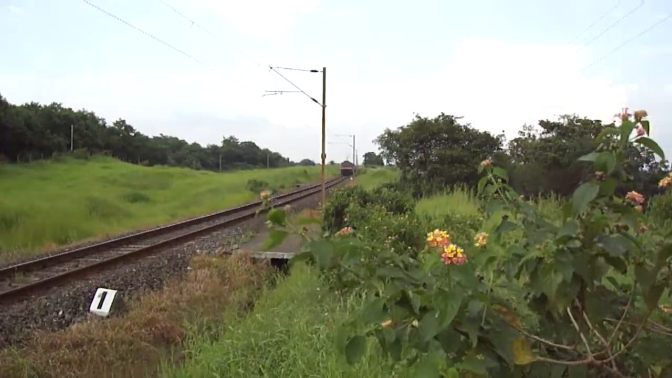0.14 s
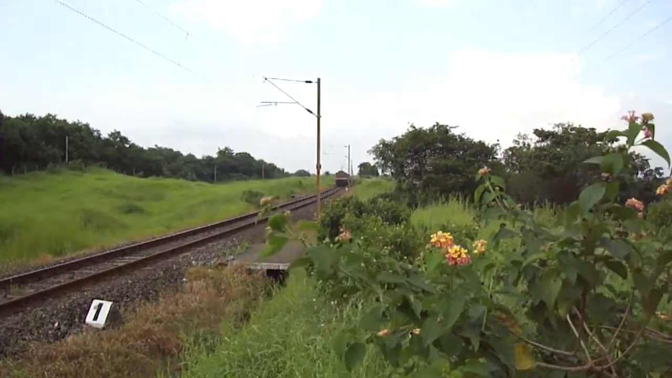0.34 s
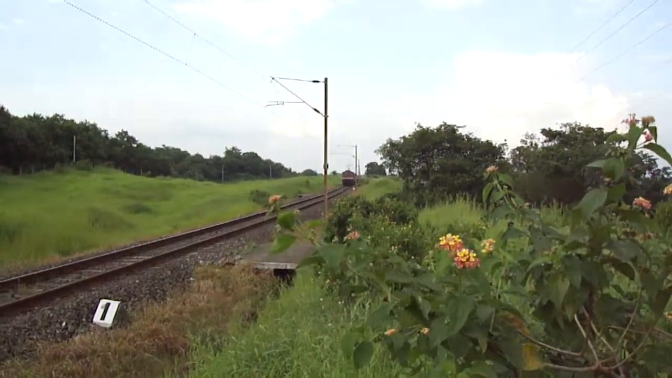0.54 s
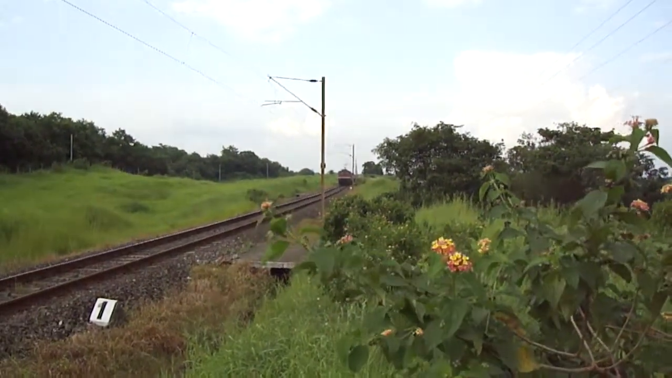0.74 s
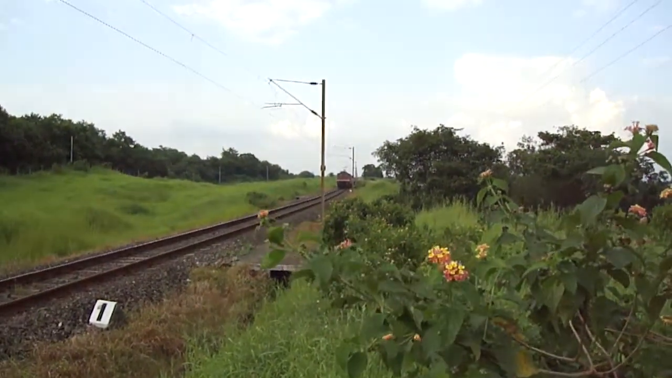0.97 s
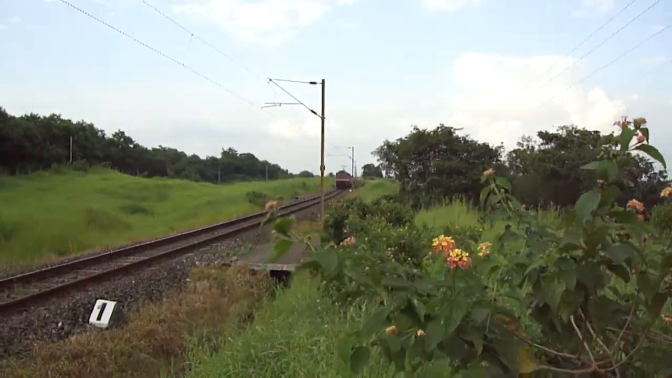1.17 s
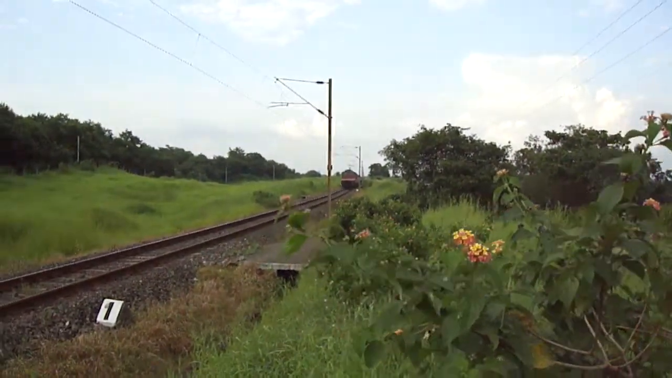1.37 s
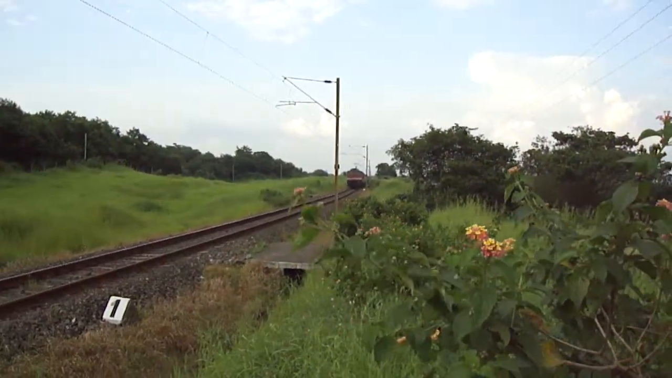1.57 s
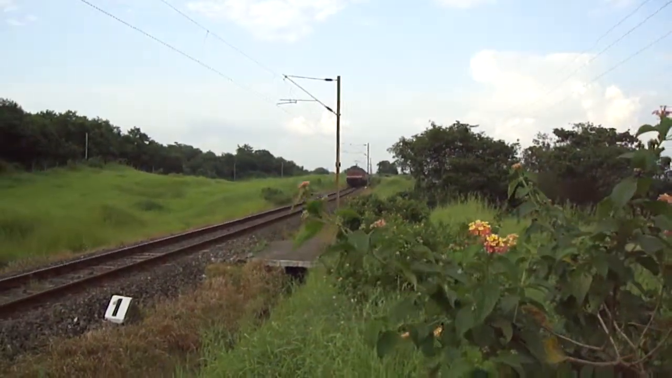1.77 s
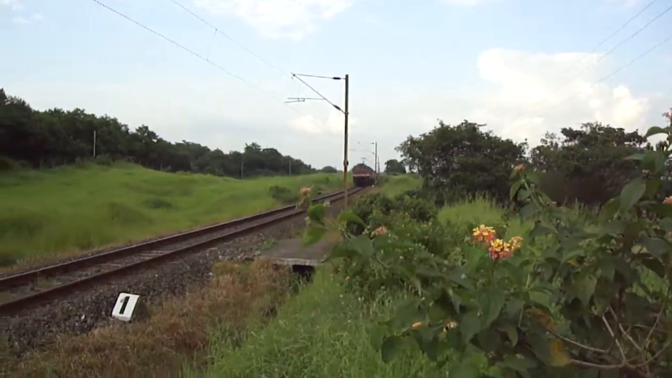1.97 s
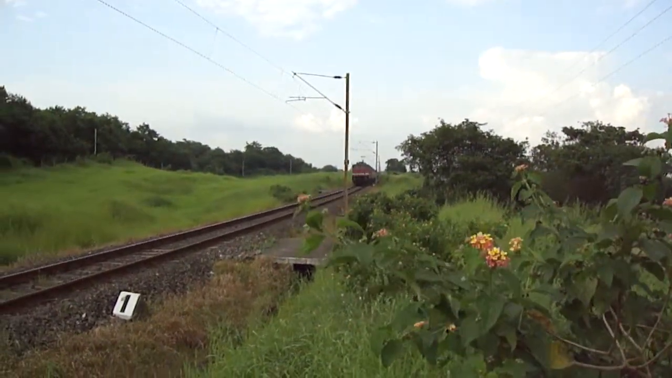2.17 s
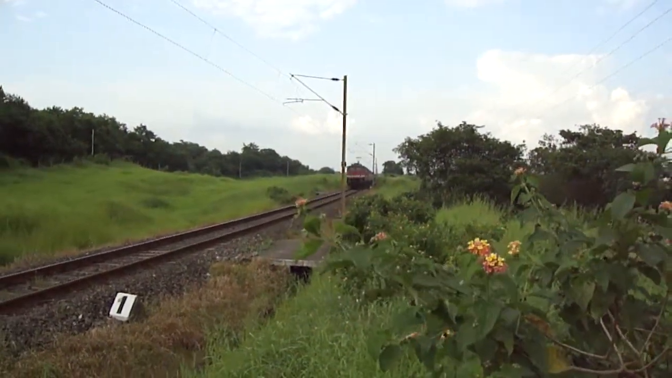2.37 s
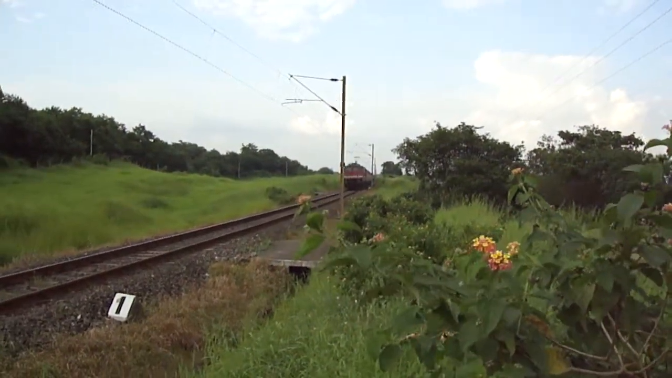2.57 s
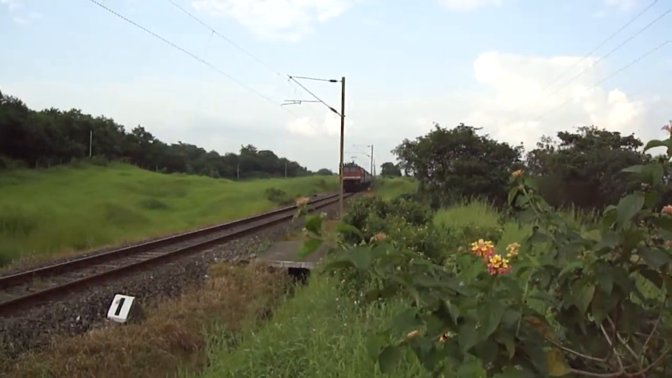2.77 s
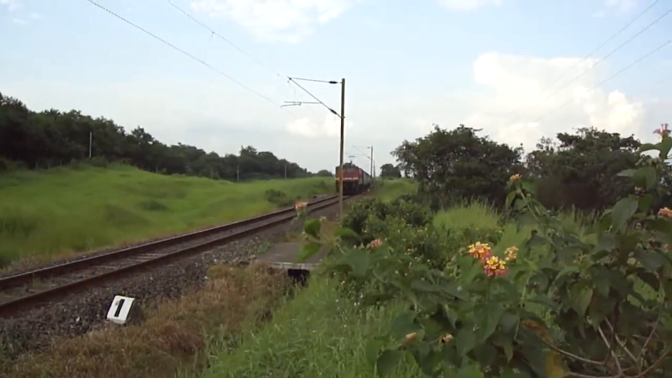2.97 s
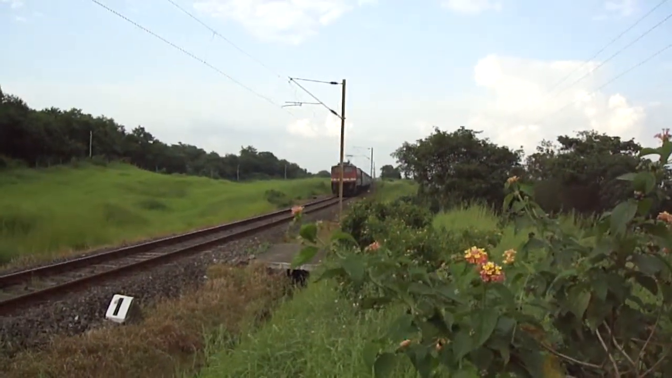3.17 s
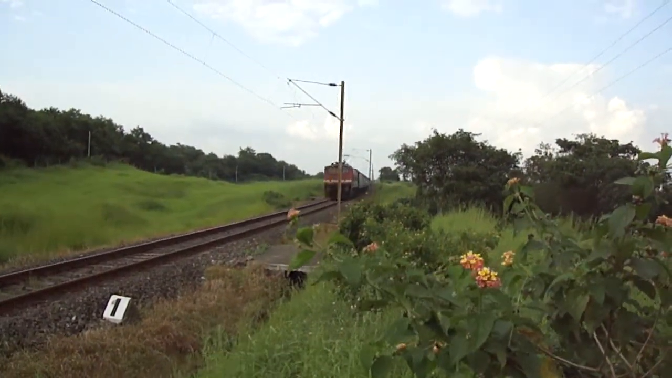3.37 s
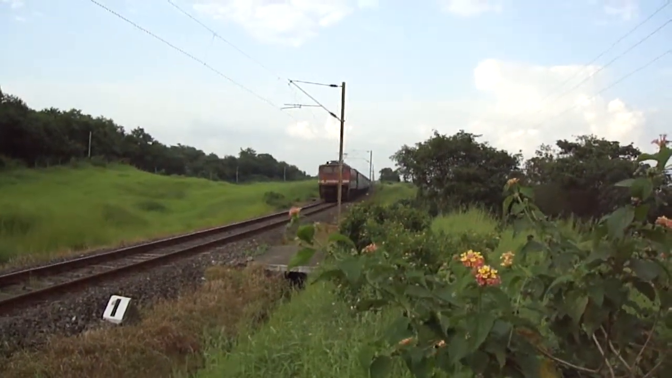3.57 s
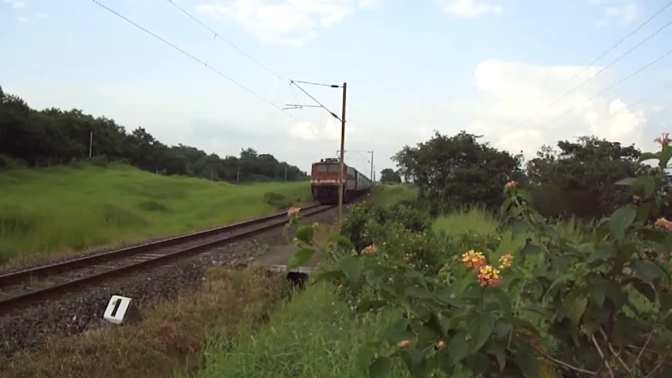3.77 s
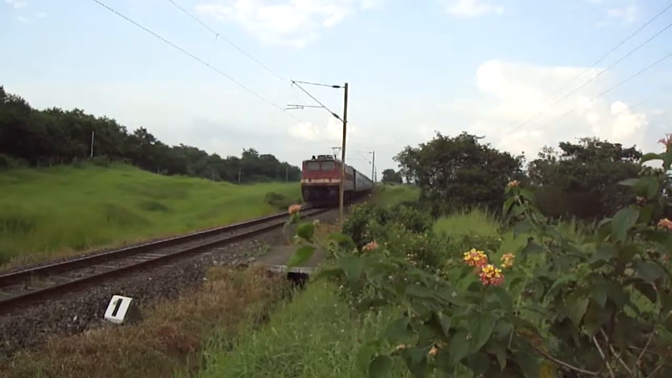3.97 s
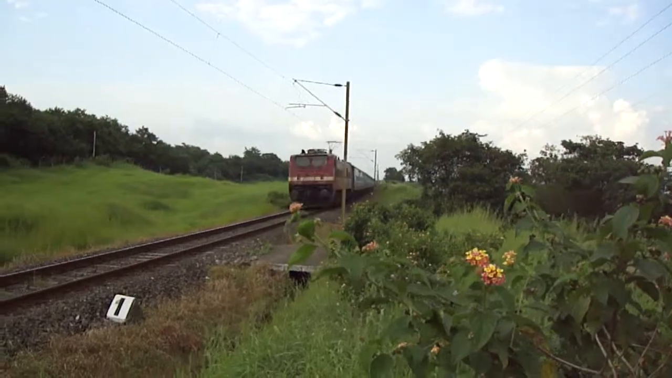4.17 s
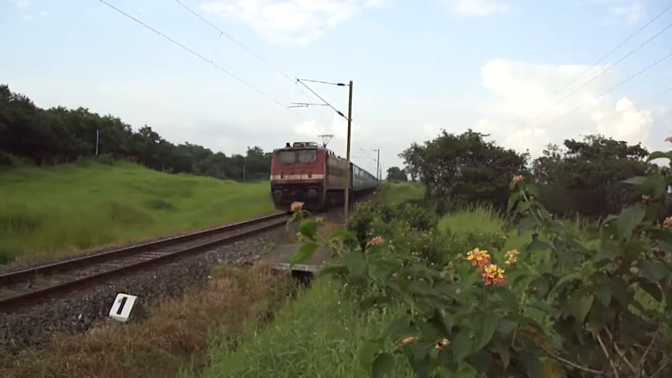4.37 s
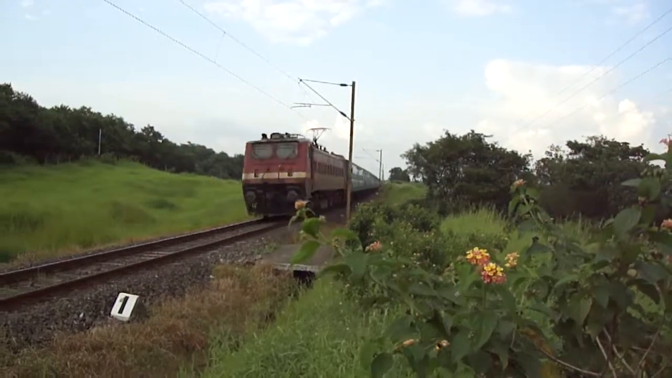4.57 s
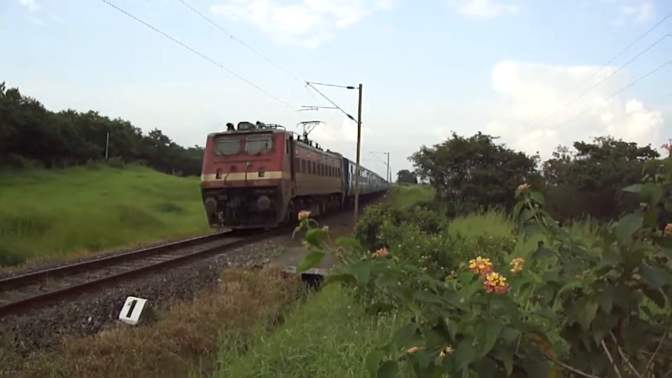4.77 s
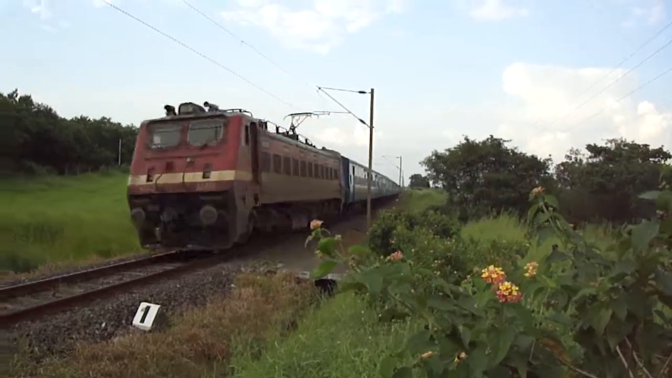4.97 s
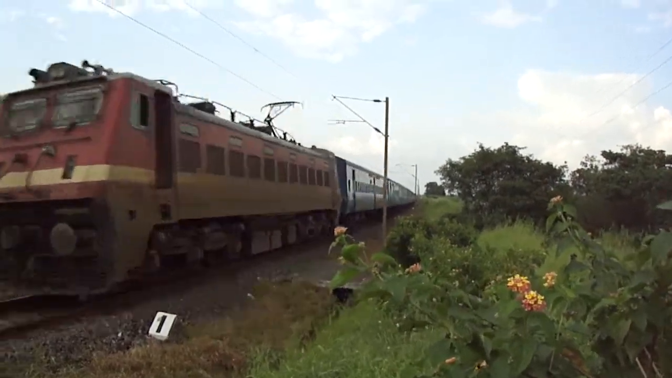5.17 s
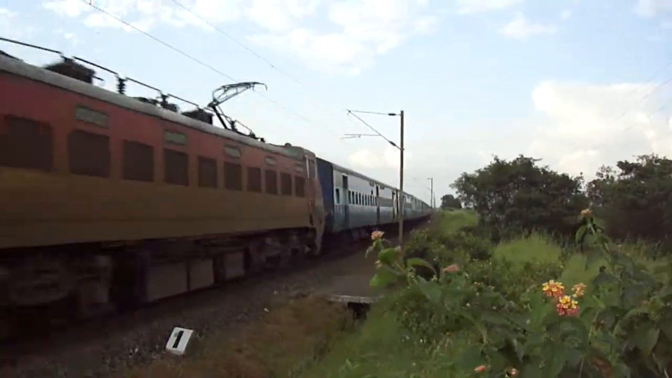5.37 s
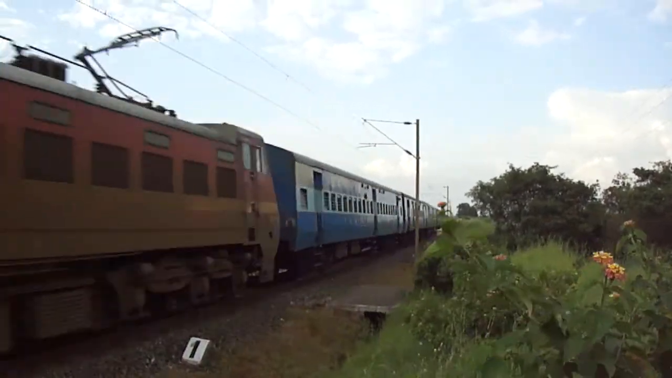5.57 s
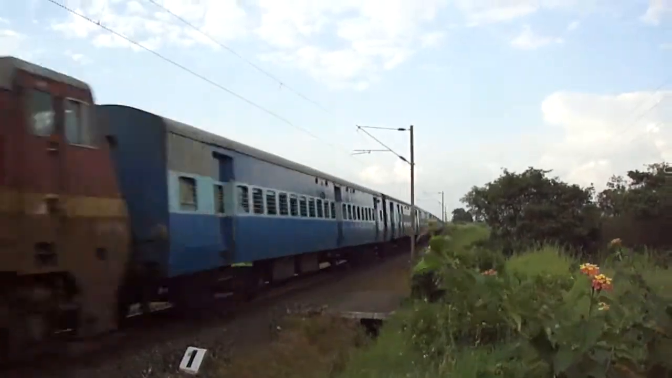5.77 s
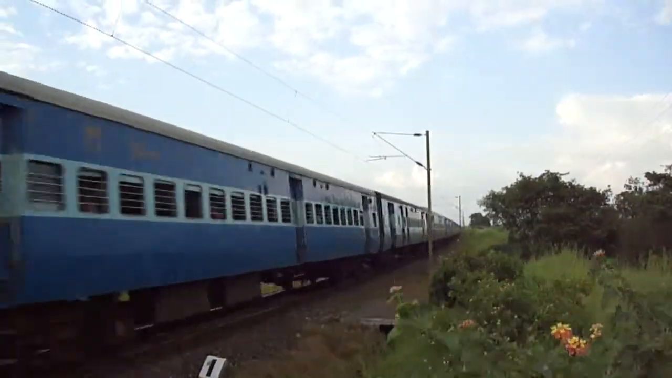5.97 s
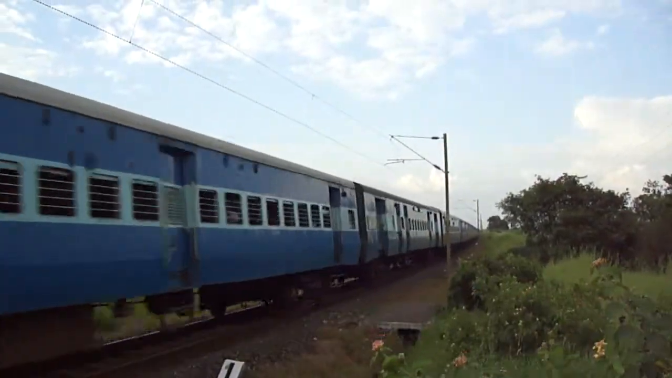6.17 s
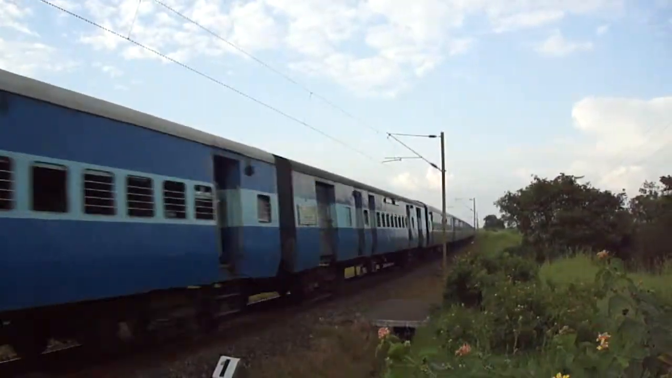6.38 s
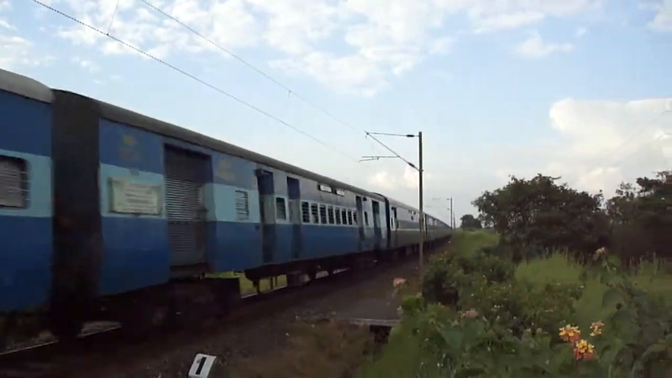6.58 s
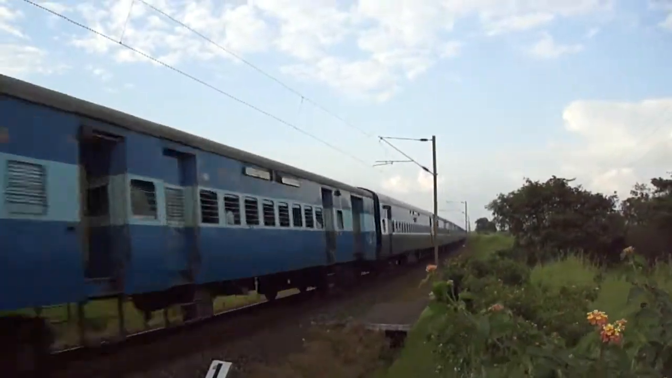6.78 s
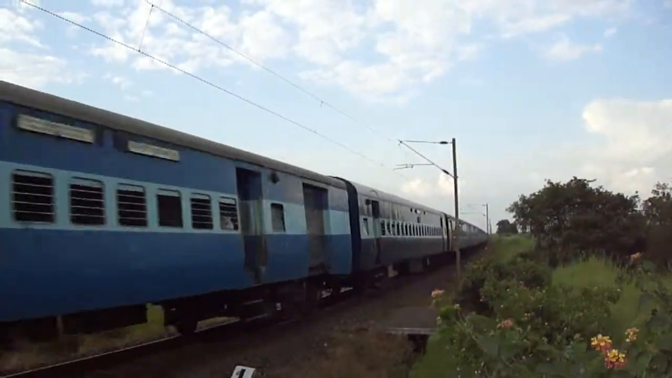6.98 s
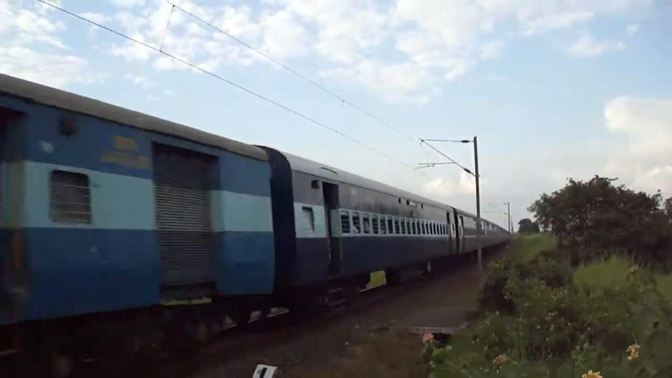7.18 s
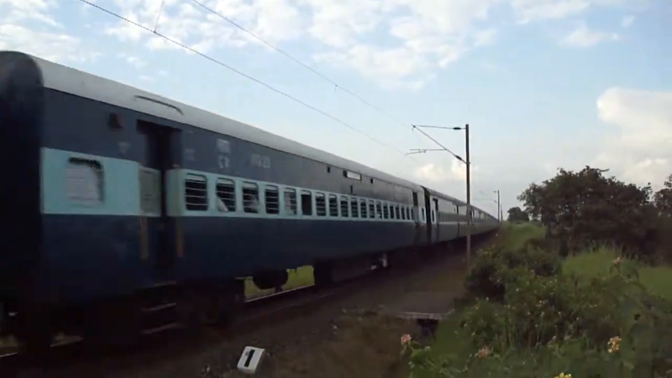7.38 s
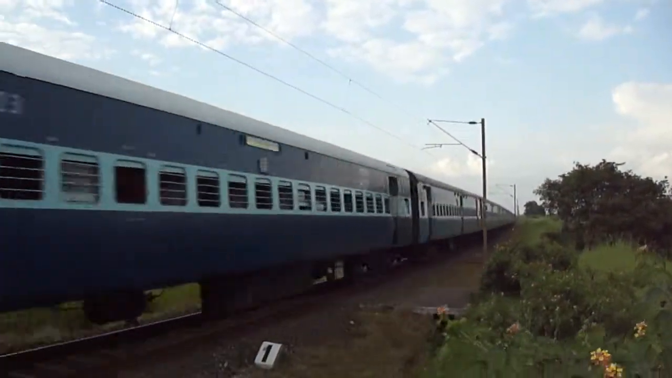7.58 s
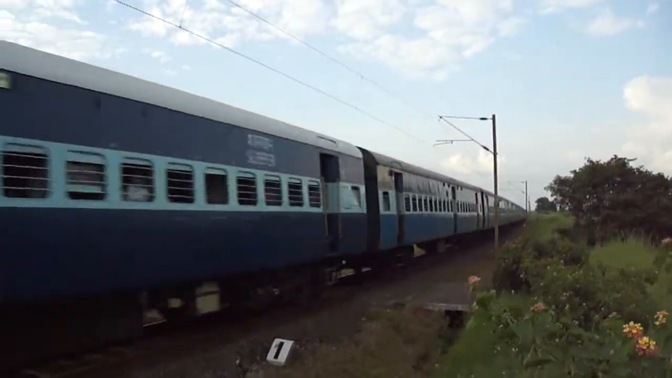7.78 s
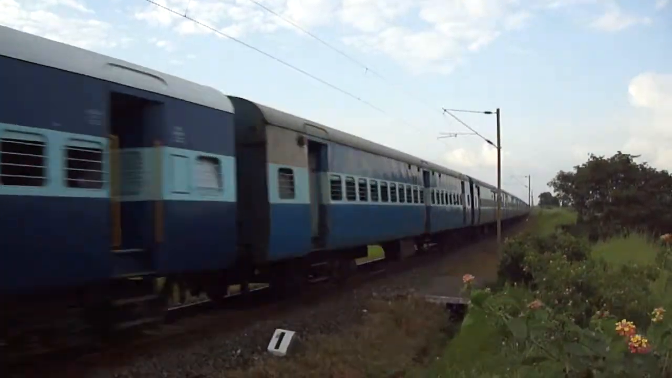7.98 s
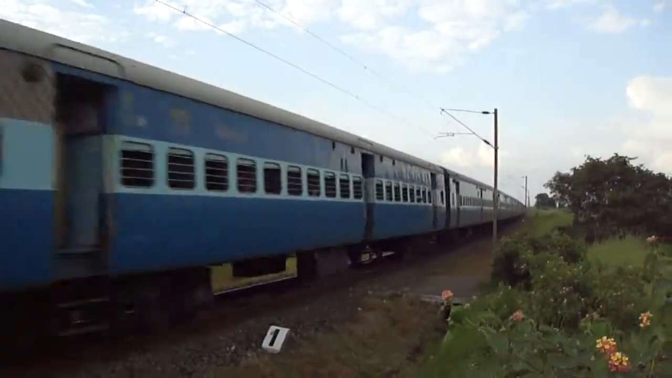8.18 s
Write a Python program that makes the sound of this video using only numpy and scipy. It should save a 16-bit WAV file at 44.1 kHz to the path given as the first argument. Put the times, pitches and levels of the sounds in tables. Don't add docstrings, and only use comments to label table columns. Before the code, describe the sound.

A small recorder sits close to open track. Quick falling bird notes and soft wind sit over a far rail hum around a steady mid pitch. The train swells, sounds a piercing horn twice in quick succession, with sagging tails and echoes, then passes in a broad wheel roar. Motor whine drops away, brief metallic squeaks flick by, and hard irregular knocks of coach wheels continue to the end.

```python
import sys
import numpy as np
from scipy import signal
from scipy.fft import rfft, irfft, next_fast_len
from scipy.io import wavfile

SR = 44100
rng = np.random.default_rng(int(sys.argv[2]) if len(sys.argv) > 2 else 0)


def elevation(decibels):
    levels = np.asarray(decibels, float)
    return 10 ** (levels / 20)


def file_out(sig):
    cols = np.atleast_2d(sig).T
    lim = np.clip(cols, -1, 1)
    pcm = np.round(lim * 32767).astype(np.int16)
    wavfile.write(sys.argv[1], SR, pcm)


N = 362943
T = np.arange(N) / SR
CUTOFF_HZ = 10930

ROLLING_HZ = [170, 600, 1000, 1400, 4000, 11200]
# pitch_hz, level_db (per Hz)
NEAR = [(18, -76), (30, -79), (181, -23), (274, -8), (318, -7), (378, -7.5), (665, -5.5), (829, -6),
        (1030, -6), (1260, -14.5), (1390, -11), (1960, -8.5), (2840, -12), (4870, -13), (10700, -27.5),
        (13900, -40), (22000, -120)]
# time_s, roar_db, weight_db (body over wheel hiss)
TRAIN = [(0, -46.5, 0), (.9, -44.5, 0.5), (1.35, -40, -2), (1.7, -38.5, -1), (2.2, -39, 1), (2.8, -37.5, 5),
         (3.4, -34, 2.5), (3.8, -31, 4), (3.93, -29.5, 5), (4.62, -20, -3), (5.16, -24.5, 3),
         (5.5, -24.5, 2), (6.05, -23.5, 5), (6.35, -27, 3.5), (6.6, -26, 0), (7.25, -26, -3.5),
         (7.5, -24.5, 0), (7.72, -27.5, 1.5), (7.9, -28, 1), (8.23, -24, -4.5)]
# opens_s, shuts_s, turned_down_db, recovery_s
VALVE = [
    (3.973, 4.37, 18.5, 0.23),
    (4.71, 4.965, 21.5, 0.08),
]
EMPTY_S = [4.46, 5.022]


def bump(x, width):
    return np.exp(-(x / width) ** 2)


def rms_one(x):
    return x / np.sqrt(np.mean(x ** 2) + 1e-20)


def in_time(rows):
    s, *columns = np.transpose(rows)
    return [np.interp(T, s, c) for c in columns]


def inside(rows, fade_s):
    return np.clip(np.minimum(T - rows[0][0], rows[-1][0] - T) / fade_s, 0, 1)


def drift(rate):
    r = np.exp(-80 * np.pi * rate / SR)
    slow = signal.lfilter([1], [1, -2 * r, r * r], rng.standard_normal(N // 40 + 2002))[2000:]
    return np.interp(np.arange(N) / 40, np.arange(len(slow)), rms_one(slow))


def noise(spectrum, low_hz, high_hz):
    size = next_fast_len(N)
    hz = np.arange(size // 2 + 1) * SR / size + 1
    colour_hz, colour_db = np.transpose(spectrum)
    colour = elevation(np.interp(np.log(hz), np.log(colour_hz), colour_db))
    edges = 1 / np.sqrt((1 + (low_hz / hz) ** 30) * (1 + (hz / high_hz) ** 30))
    return rms_one(irfft(rfft(rng.standard_normal(size)) * colour * edges, size)[:N])


def resonance(x, hz, width_hz):
    r = np.exp(-np.pi * width_hz / SR)
    top = (1 - r * r) / 2
    return signal.lfilter([top, 0, -top], [1, -2 * r * np.cos(2 * np.pi * hz / SR), r * r], x + 1e-18)


def nearness():
    # time_s, share (0-1)
    closing_in = [
        (0, 0),
        (4.0, 0.02),
        (5.4, 0.55),
        (6.3, 0.94),
        (8.3, 1),
    ]
    return np.clip(in_time(closing_in)[0], 0, 1)


def whine(rows, waver_db, waver_rad):
    hz, level_db = in_time(rows)
    phase = 2 * np.pi * np.cumsum(hz) / SR + waver_rad * drift(12.2)
    return np.sqrt(2) * elevation(level_db + waver_db * drift(50)) * np.sin(phase) * inside(rows, 0.0065)


def rolling(patchy_db):
    # pitch_hz, level_db (per Hz)
    far_colour = [(160, -26), (350, -28.5), (520, -28.5), (690, -6.5), (1000, -8), (1500, -22), (2800, -29),
                  (3400, -26), (4100, -34), (5300, -37), (7000, -40), (8200, -48.5), (10700, -49.5),
                  (12000, -51)]
    # far_db, near_db, far_share and near_share (of the weight)
    band_levels = [
        (-8, -6, 0.53, 0.67),
        (-0.5, -1, 1.13, -0.11),
        (-0.5, -1, 0.012, -0.17),
        (-8, -5.5, 0.24, -0.98),
    ]
    # time_s, swell_db, pitch_hz
    swells = [(5.85, 6.5, 930), (5.3, 5.5, 4700), (5.231, 6, 4700), (5.13, 4, 4500), (5.3, 3.5, 300),
              (5.4, 4, 300), (5.48, 3.5, 260), (5.98, -0.5, 5300), (7.23, -2, 800), (5.38, 3.5, 3600),
              (5.55, 4.5, 1900), (5.45, 3.5, 3400), (5.4, 3, 4600), (6.5, 6.5, 800), (6.58, 2, 900),
              (6.67, 7.5, 430), (6.792, 13.5, 970), (6.95, 2.5, 6100), (7.09, 4, 620), (7.17, 4, 330),
              (9.1, 1, 7000), (7.29, 2.5, 7000), (7.34, 6.5, 360), (7.385, 7, 760), (7.39, 3, 2400),
              (7.46, -7, 600), (7.55, 4, 900), (7.56, 4, 2800), (10, 6, 500), (7.5, 0, 1100),
              (5.17, 2, 3000), (7.8, 1.5, 1200), (8.9, 3, 800)]
    swell_s, swell_octaves = 0.031, 1
    near = nearness()
    roar_db, weight_db = in_time(TRAIN)
    together = drift(14)
    bands = [ROLLING_HZ[0:2], ROLLING_HZ[1:3], ROLLING_HZ[3:5], ROLLING_HZ[4:6]]
    coarse = T[::100]
    out = 0
    for band, (far_db, near_db, far_share, near_share) in zip(bands, band_levels):
        middle_hz = np.sqrt(np.prod(band))
        swell_db = sum(db * bump(coarse - s, swell_s) * bump(np.log2(hz / middle_hz), swell_octaves)
                       for s, db, hz in swells)
        level_db = roar_db + np.interp(T, coarse, swell_db)
        level_db = level_db + (1 - near) * (far_db + far_share * weight_db)
        level_db = level_db + near * (near_db + near_share * weight_db)
        flutter_db = patchy_db * (.5 + near) * (together + drift(14))
        mix = np.sqrt(1 - near) * noise(far_colour, *band) + np.sqrt(near) * noise(NEAR, *band)
        out = out + mix * elevation(level_db + flutter_db)
    return out


def blower():
    # time_s, level_db
    duct = [(0, -31), (1, -28), (2, -25), (3, -23), (3.93, -20.5), (4.6, -16.5), (5.16, -20.5),
            (5.9, -20.5), (6.2, -23.5), (6.5, -27), (8.3, -27)]
    # pitch_hz, level_db (per Hz)
    duct_colour = [(560, -43), (950, -22.5), (1050, -5.5), (1070, -6), (1140, 1), (1160, 0.5), (1250, -4.5),
                   (1340, -10.5), (1480, -55), (1920, -67), (3260, -120)]
    # start_s, lift_db
    gusts = [(.083, -5), (.838, 9.5), (.972, 8), (1.09, 14.5), (1.22, 5), (1.303, 7), (1.418, 13),
             (1.728, 3), (1.92, 3), (2.274, 2), (2.451, 7), (2.577, -5), (2.687, 7), (2.784, 9), (2.901, 4),
             (2.998, 1), (3.12, 4), (3.194, -3), (3.282, -4), (3.491, 4), (3.578, -2), (3.629, 6),
             (3.785, 9), (3.888, 4)]
    gust_s = 0.0029
    near = nearness()
    mix = np.sqrt(1 - near) * noise(duct_colour, 920, 1740)
    mix = mix + np.sqrt(near) * noise(NEAR, *ROLLING_HZ[2:4])
    gusts_db = sum(db * bump(T - s - gust_s, gust_s) for s, db in gusts)
    return elevation(in_time(duct)[0] + gusts_db) * mix


def rattle(per_s, hz, width_hz):
    # time_s, level_db (against the roar)
    ringing = [(0, -23), (1.5, -23), (3.2, -26), (3.7, -26), (5.2, -10.5), (5.6, -17), (5.9, -30)]
    chance = per_s * elevation(5.0 * drift(12)) / SR
    clicks = (rng.random(N) < chance) * rng.standard_normal(N)
    ring = resonance(resonance(clicks, hz, width_hz), hz, width_hz)
    return elevation(in_time(TRAIN)[0] + in_time(ringing)[0]) * rms_one(ring)


def motor_whine():
    # time_s, pitch_hz, level_db
    oncoming = [(0, 1105, -38), (.6, 1105, -36), (1.2, 1105, -31), (2, 1105, -28), (2.6, 1105, -24),
                (3.2, 1105, -23), (3.9, 1105, -21), (4.7, 1105, -20), (5.0, 1105, -24)]
    front_bogie = [(4.5, 1180, -17), (5.06, 1160, -26), (5.3, 1140, -25), (5.47, 1135, -23),
                   (5.6, 1085, -24), (5.72, 1045, -24), (5.85, 1015, -28), (5.95, 1005, -27)]
    rear_bogie = [(5.955, 1088, -48), (5.99, 1082, -19.5), (6.08, 1045, -17.5), (6.14, 1030, -31),
                  (6.24, 1017, -18.5), (6.33, 989, -30.5), (6.44, 1001, -24), (6.52, 1030, -34),
                  (6.7, 1018, -24)]
    out = whine(oncoming, waver_db=1.2, waver_rad=.2)
    out += whine(front_bogie, waver_db=3.6, waver_rad=1.3)
    return out + whine(rear_bogie, waver_db=3.0, waver_rad=1.1)


def transformer_hum():
    # time_s, pitch_hz, level_db
    hum = [(0, 489, -66.5), (1, 501, -60.5), (2.3, 509, -51.5), (3.2, 497, -45.5), (3.9, 503, -41),
           (4.7, 494, -39.5)]
    return whine(hum, waver_db=5.0, waver_rad=1.4)


def insect():
    # time_s, level_db
    loudness = [(0, -71), (2, -67), (3.6, -63), (4.2, -70)]
    hz, width_hz = 9500, 51
    song = resonance(resonance(rng.standard_normal(N), hz, width_hz), hz, width_hz)
    return elevation(in_time(loudness)[0] + 2.0 * drift(8)) * rms_one(song)


def wind():
    # time_s, level_db
    breeze = [(0, -56), (.2, -54), (.5, -62), (.78, -57.5), (1.1, -55), (1.4, -56.5), (1.7, -57),
              (2.1, -52), (2.4, -53), (2.85, -45), (3.3, -51.5), (3.9, -51), (4.2, -48), (4.6, -46),
              (5.6, -50), (6.2, -53.5), (8.3, -52.5)]
    # pitch_hz, level_db (per Hz)
    breeze_colour = [(15, -46), (25, -25), (65, -5), (128, -1.5), (161, 3), (260, -1), (340, -45),
                     (570, -120)]
    return elevation(in_time(breeze)[0] + 2.0 * drift(1.6)) * noise(breeze_colour, 20, ROLLING_HZ[0])


def bird():
    # start_s, length_s, level_db
    notes_sung = [(.306, .03, -50), (.347, .026, -51), (.38, .034, -50), (.425, .034, -48),
                  (.482, .045, -43), (.55, .044, -43), (.618, .043, -43), (1.752, .036, -44),
                  (1.812, .037, -41), (1.874, .042, -39), (1.944, .042, -40), (3.012, .03, -45),
                  (3.066, .031, -38), (3.13, .034, -38), (3.2, .029, -39)]
    end_hz, slide_hz_per_s = 4950, 27000
    out = np.zeros(N)
    for s, length, level_db in notes_sung:
        u = np.linspace(0, 1, round(length * SR))
        hz = end_hz + slide_hz_per_s * length * (1 - u) ** 1.45
        swell = np.sin(np.pi * u ** 1.4) ** .5
        note = elevation(level_db) * swell * np.sin(2 * np.pi * np.cumsum(hz) / SR)
        out[round(s * SR):][:len(u)] += note
    return out


def squeaks(rough_rad):
    # start_s, length_s, start_hz, end_hz, level_db
    short_rings = [(4.6, .09, 155, 140, -46), (4.56, .14, 388, 375, -38), (4.54, 0.17, 3480, 3600, -40),
                   (4.685, .03, 3620, 3580, -36), (5.127, 0.071, 3450, 3480, -34),
                   (5.3, .1, 2150, 2200, -32), (5.443, 0.1, 2430, 2330, -31),
                   (5.643, 0.055, 2570, 2590, -31), (6.6, 0.14, 2520, 2430, -35),
                   (4.622, 0.03, 3490, 3500, -32), (4.716, 0.25, 714, 717, -38.5),
                   (5.499, 0.11, 3080, 3060, -32), (5.871, 0.116, 2080, 2000, -29),
                   (5.579, 0.14, 236, 213, -31.5), (6.467, 0.051, 1857, 1910, -28),
                   (6.48, .12, 2660, 2680, -37), (6.78, .15, 2670, 2500, -30), (6.84, .1, 3360, 3340, -33),
                   (6.94, .18, 3150, 3080, -36), (7.27, .03, 2050, 2000, -29), (.478, .07, 2790, 2770, -54),
                   (7.695, .05, 2460, 2440, -33), (5.41, .12, 1580, 1560, -29),
                   (5.74, .26, 1600, 1520, -31), (6.0, .14, 1950, 1850, -32), (7.0, .28, 1900, 1960, -36),
                   (7.33, .28, 1960, 1930, -36), (3.585, .075, 4600, 4620, -44),
                   (3.61, .035, 3560, 3570, -39), (3.645, .025, 3650, 3640, -39),
                   (3.73, .05, 3500, 3350, -39), (3.76, .055, 4560, 4600, -46),
                   (3.77, .04, 3150, 3050, -39), (6.875, .03, 4000, 3950, -36),
                   (7.922, 0.018, 3350, 3200, -29), (7.95, .06, 7500, 7580, -42),
                   (8.04, 0.13, 4950, 5050, -36), (8.05, .03, 4400, 4400, -34)]
    shake = rough_rad * drift(29)
    waver = elevation(2 * drift(35))
    out = np.zeros(N)
    for s, length, start_hz, end_hz, level_db in short_rings:
        u, at = np.linspace(0, 1, round(length * SR)), round(s * SR)
        turns = np.cumsum(start_hz + (end_hz - start_hz) * u) / SR
        ring = np.sin(2 * np.pi * turns + shake[at:][:len(u)])
        out[at:][:len(u)] += np.sqrt(2) * elevation(level_db) * np.sin(np.pi * u) ** 0.31 * ring
    return out * waver


def leaves():
    middle_s, half_s, level_db = 1.64, .4, -49
    hz, width_hz = 5400, 900
    rustle = resonance(resonance(rng.standard_normal(N), hz, width_hz), hz, width_hz)
    return elevation(level_db + 2.5 * drift(10)) * bump(T - middle_s, half_s) * rms_one(rustle)


def horn(waver_db, air_db):
    # time_s, pitch_hz, level_db
    blasts = [
        [(3.958, 814.3, -33), (3.972, 840, -14), (3.988, 841.5, -23), (4.07, 838, -27), (4.28, 837.4, -27),
         (4.38, 837.4, -15), (4.46, 833.8, -13), (4.55, 815, -18), (4.64, 795, -25)],
        [(4.695, 828.7, -29), (4.72, 835, -14), (4.77, 838, -14.5), (4.895, 833.7, -23), (4.965, 833.9, -15),
         (5.018, 828.7, -13), (5.07, 815, -15), (5.125, 797, -19), (5.155, 790, -30)],
    ]
    # opening_db, shutting_db, swell_s, swell_db
    overtones = [
        [(-16.5, -17, 4.17, -2.5), (-26.5, -21.5, 4.2, 1), (-33.5, -25, 4.22, 6), (-32.5, -29.5, 4.28, -2)],
        [(-23.5, -19.5, 4.91, 3), (-24.5, -24, 4.86, -2.5), (-42.5, -24, 4.75, 10), (-38.5, -37, 4.88, -4)],
    ]
    # partial, then start_db and end_db of the first blast and of the second
    upper_partials = [(5, -7, -2, 0, -2), (6, -5, -5, -2, -2), (7, 0, 0, 0, 0), (8, -22, -24, -11, -6),
                      (9, -21, -12, -3, 0), (10, -36, -16, -19, -13), (11, -22, -13, -14, -10),
                      (12, -25, -15, -11, -6), (13, -32, -19, -16, -10)]
    # time_s, partial, lift_db
    flutters = [(4.152, 9, -8), (4.228, 9, 5), (4.278, 7, -5), (4.33, 6, 4), (4.352, 4, -6), (4.354, 9, 3),
                (4.354, 11, 6), (4.354, 13, 3), (4.778, 2, -7), (4.816, 5, 6), (4.894, 6, -6),
                (4.966, 13, 6), (4.978, 2, -10), (4.993, 1, -4), (4.997, 4, -7), (5.016, 1, 4),
                (3.98, 8, 10), (4.99, 5, -5), (4.99, 7, -4), (4.07, 5, -5), (4.09, 4, -3), (4.09, 11, -5),
                (4.11, 10, -6), (4.19, 7, 3), (4.2, 5, -3), (4.22, 6, -5), (4.23, 10, 5), (4.26, 5, 4),
                (4.27, 4, 3), (4.27, 11, 4), (4.31, 3, -3), (4.31, 9, -6), (4.33, 7, 4), (4.37, 5, -9),
                (4.38, 10, -5), (4.39, 4, 4), (4.42, 5, 4), (4.44, 3, 4), (4.45, 4, 6), (4.2, 1, -3),
                (4.73, 8, 9), (4.73, 3, -4), (4.75, 5, -4), (4.75, 6, -5), (4.79, 3, 3), (4.79, 7, 3),
                (4.8, 10, -7), (4.81, 11, -7), (5.045, 1, -6), (4.84, 9, -5), (4.86, 7, -4), (4.87, 11, 5),
                (4.885, 5, 7), (4.885, 7, 4), (4.92, 5, 5), (4.92, 10, -6), (4.98, 8, -8), (5.0, 6, -8),
                (5.01, 7, -6), (5.01, 3, -4)]
    speaks_s = [3.977, 4.73]
    fades = [60, 90, 170, 290]
    swell_half_s, flutter_s = 0.043, .019
    speak_db_per_s = 2000
    top_leads_s, upper_lags_s = .011, .008
    top_lingers_db_per_s = 188
    empty_faster = 5.5
    beat_s, beat_db = .037, 11
    air_colour = [(1000, -2.0), (4000, 1.0), (7000, -1), (11000, -8.0)]   # pitch_hz, level_db
    columns = [slice(1, 3), slice(3, 5)]
    out = 0
    for blast, valve, speaks, empty, rows, tilt in zip(blasts, VALVE, speaks_s, EMPTY_S, overtones, columns):
        hz, first_db = in_time(blast)
        phase, span = 2 * np.pi * np.cumsum(hz) / SR, valve[:2]
        rise_db = speak_db_per_s * np.maximum(speaks - T, 0)
        fading_s = np.maximum(T - span[1], 0) + empty_faster * np.maximum(T - empty, 0)
        beat_age = T - empty - .025
        beat = (beat_age > 0) * bump(beat_age % beat_s / beat_s - .5, .2)
        levels = [(1, first_db - beat_db * beat + .7 * drift(18))]

        group_db = []
        for (open_db, shut_db, s, swell_db), fade in zip(rows, fades):
            db = np.interp(T, span, [open_db, shut_db]) + swell_db * bump(T - s, swell_half_s)
            group_db.append(db - fade * fading_s - rise_db)
        *low_db, upper_db = group_db
        levels += [(k, db + .7 * drift(18)) for k, db in zip([2, 3, 4], low_db)]

        for row in upper_partials:
            k = row[0]
            db = upper_db + np.interp(T, span, row[tilt]) + waver_db * drift(35)
            if k > 8:
                db = db + top_lingers_db_per_s * fading_s
            if k > 7:
                db = db + np.minimum(rise_db, speak_db_per_s * top_leads_s)
            else:
                db = db - speak_db_per_s * np.clip(speaks + upper_lags_s - T, 0, upper_lags_s)
            levels.append((k, db))

        tone = 0
        for k, db in levels:
            lift_db = sum(lift * bump(T - s, flutter_s) for s, partial, lift in flutters
                          if partial == k and span[0] < s < blast[-1][0])
            tone = tone + elevation(db + lift_db) * np.sin(round(k) * phase + rng.uniform(0, 2 * np.pi))
        escaping_air = elevation(low_db[1] + air_db) * noise(air_colour, 1500, CUTOFF_HZ)
        out = out + (np.sqrt(2) * tone + escaping_air) * inside(blast, 0.011)
    return out


def ducking():
    attack_s, quiet_gain_db = 0.03, 2
    dives = []
    for opens, shuts, depth_db, recovery_s in VALVE:
        dive = np.clip((T - opens) / attack_s, 0, 1)
        dives.append(-depth_db * dive * np.exp(-np.maximum(T - shuts, 0) / recovery_s))
    return quiet_gain_db * np.clip(1 - T / VALVE[0][0], 0, 1) + np.min(dives, axis=0)


def horn_echo():
    # time_s, pitch_hz, level_db (before the recorder turns it down)
    echoes = [
        [(4.0, 822, -22), (4.2, 818, -19), (4.45, 806, -19), (4.54, 798, -23), (4.7, 785, -27)],
        [(4.72, 812, -30), (4.8, 815, -14), (4.97, 806, -10), (5.05, 796, -19), (5.2, 780, -36)],
    ]
    return sum(whine(echo, waver_db=3.0, waver_rad=.6) for echo in echoes)


def pipe_ring():
    # time_s, pitch_hz, level_db
    rings = [
        [(4.39, 6695, -46), (4.43, 6688, -37), (4.47, 6668, -40), (4.52, 6640, -48)],
        [(4.97, 6670, -50), (5.02, 6635, -46), (5.08, 6600, -50)],
    ]
    return sum(whine(ring, waver_db=1.5, waver_rad=.2) for ring in rings)


def puffs():
    level_db, half_s, late_s = -44, 0.16, 0.045
    hiss = noise([(5000, 3.0), (8000, 0.0), (11000, 3.0)], 5000, CUTOFF_HZ)
    return elevation(level_db) * sum(bump(T - s - late_s, half_s) for s in EMPTY_S) * hiss


def wheel_ring(per_s, ring_db, width_hz):
    # pitch_hz, level_db
    wheel_modes = [(1580, 4.5), (1950, 1.5), (2650, -21), (3300, -12), (4900, -5.5)]
    out = 0
    for hz, level_db in wheel_modes:
        strength = elevation(3.0 * np.minimum(rng.exponential(1, N), 4))
        clicks = (rng.random(N) < per_s / SR) * strength * rng.choice([-1, 1], N)
        out = out + elevation(level_db) * rms_one(resonance(clicks, hz, width_hz))
    return elevation(in_time(TRAIN)[0] + ring_db) * nearness() * out


def joints(rise_s, knock_db, knock_t60, crack_t60):
    # start_s, peak_db, crack_db (against the knock), deep_db (low body modes)
    hits = [(5.178, -25, -10, 0), (5.488, -12, -3, -5), (5.701, -14, -19, 0), (5.983, -27, 9, 0),
            (6.067, -9.5, -26, 5), (6.257, -10.5, -11, -3), (6.295, -20, -18, 0), (6.412, -15.5, -14, -3),
            (6.461, -3, -19, 1.5), (6.52, -14, -16, 5), (6.575, -6.5, -10, 1), (6.61, -9, -16, -3),
            (6.499, -5, -22, -7), (6.648, -6.5, -30, -2), (6.672, -7, -24, -1), (6.768, -3, -12, 0),
            (6.806, -7, -10, 1), (6.835, -30, -14, -3), (7.068, -9, -16, 6.5), (7.092, -22, 6.5, -3),
            (7.147, -1, -24, 1), (7.189, -10, -3, 1), (7.282, -7.5, -2, 2.5), (7.364, -0.5, -24, 1),
            (7.389, -12, -15, -4), (7.465, -19, 6.5, -5), (7.549, -8, -11, -5), (7.577, -4, -13, -3),
            (7.618, -10, -10, -6), (7.705, -13, -13, -7), (7.769, -4.5, -30, -9), (7.812, -7, -33, -2),
            (7.915, -12, -10, 8), (7.989, -15, -20, 10), (8.005, -12, -18, 5), (8.062, -10.5, 1, 1),
            (8.098, -14, -9, -1), (8.136, -7, -4.5, -4), (8.16, -14, -14, 0), (8.205, -10, -10, 4)]
    # pitch_hz, width_hz, level_db
    body_modes = [(354, 140, -39), (578, 140, 2), (820, 18, 4), (1030, 210, 5.5), (1830, 180, -2)]
    knock, deep, crack = np.zeros((3, N))
    for s, peak_db, crack_db, deep_db in hits:
        at = round(s * SR)
        age = T[:N - at][:SR // 2]
        blow = elevation(peak_db - 60 * age / knock_t60) * (1 - np.exp(-age / rise_s))
        knock[at:][:len(age)] += blow
        deep[at:][:len(age)] += blow * elevation(deep_db)
        crack[at:][:len(age)] += elevation(peak_db + crack_db - 60 * age / crack_t60)
    modes = [elevation(db) * rms_one(resonance(rng.standard_normal(N), hz, width)) for hz, width, db in body_modes]
    modes = signal.sosfilt(signal.butter(4, 200, "high", fs=SR, output="sos"), modes)
    body = (deep * modes[:3].sum(0) + knock * modes[3:].sum(0)) / modes.sum(0).std()
    return elevation(knock_db) * (body + crack * noise(NEAR, 4000, CUTOFF_HZ))


def scene():
    train = rolling(patchy_db=.35) + blower() + rattle(per_s=330, hz=3280, width_hz=450)
    train += motor_whine() + transformer_hum()
    train += wheel_ring(per_s=170, ring_db=-14.0, width_hz=57)
    train += joints(rise_s=0.004, knock_db=-9.5, knock_t60=0.13, crack_t60=0.06)
    lineside = insect() + wind() + bird() + horn_echo()
    ducked = elevation(ducking()) * (train + lineside)
    on_top = squeaks(rough_rad=1.2) + leaves() + horn(waver_db=1.7, air_db=-22) + pipe_ring() + puffs()
    return (ducked + on_top)[None]


def top_cut(x):
    return signal.sosfilt(signal.butter(12, 13460, fs=SR, output="sos"), x)


def record(dry):
    converter_hz, image_db = 24000, -24
    rounded = 1.5 * np.tanh(dry / 1.5)
    rounded = signal.sosfilt(signal.butter(2, 25, "high", fs=SR, output="sos"), rounded)
    cut = signal.sosfilt(signal.ellip(12, .3, 90, CUTOFF_HZ, fs=SR, output="sos"), rounded)
    edge = signal.sosfilt(signal.butter(6, [10650, 11100], "band", fs=SR, output="sos"), cut)
    mirror = 2 * edge * np.cos(2 * np.pi * converter_hz * T)
    mirror = signal.sosfilt(signal.butter(6, [12900, 13400], "band", fs=SR, output="sos"), mirror)
    return top_cut(cut + elevation(image_db) * mirror)


dry = scene()
out = record(dry)
file_out(out)
```